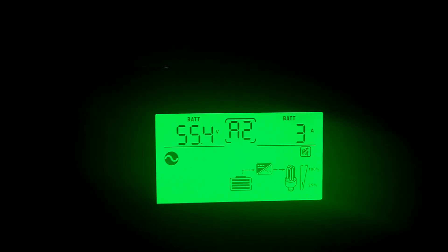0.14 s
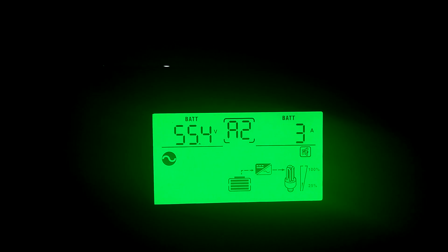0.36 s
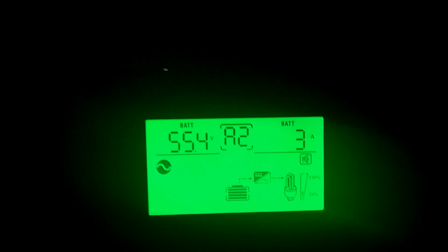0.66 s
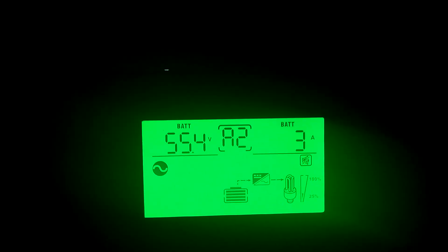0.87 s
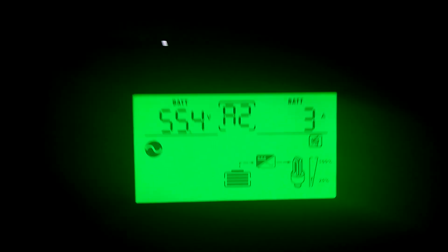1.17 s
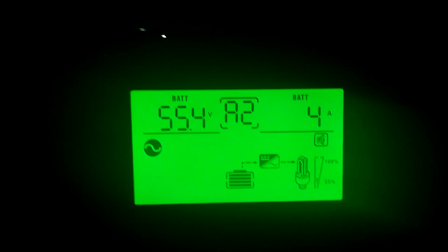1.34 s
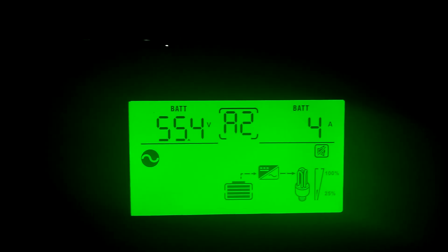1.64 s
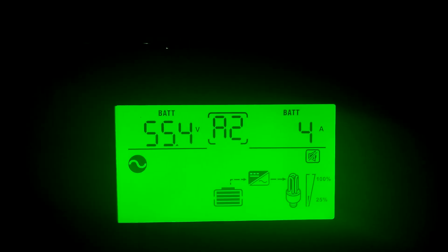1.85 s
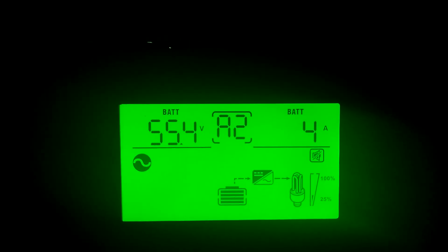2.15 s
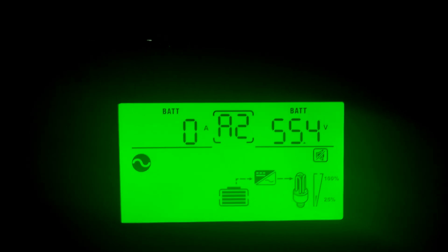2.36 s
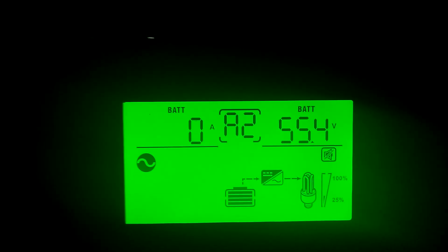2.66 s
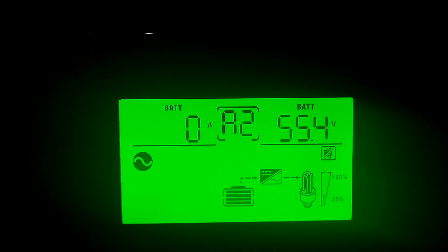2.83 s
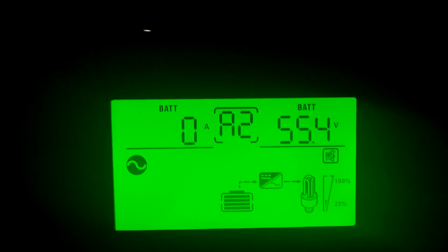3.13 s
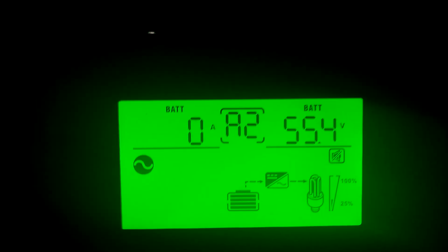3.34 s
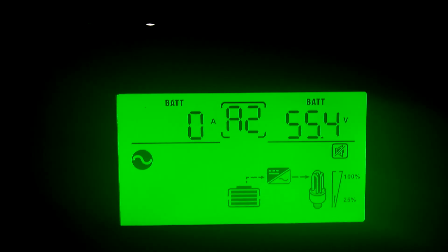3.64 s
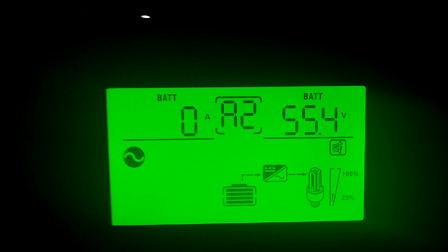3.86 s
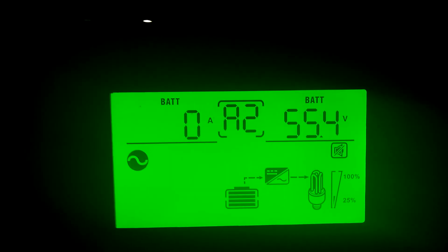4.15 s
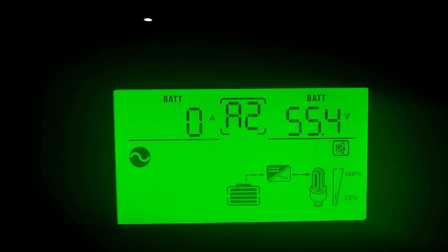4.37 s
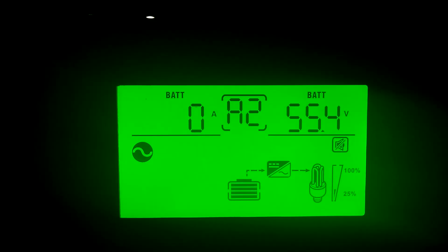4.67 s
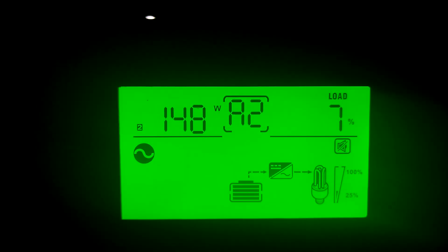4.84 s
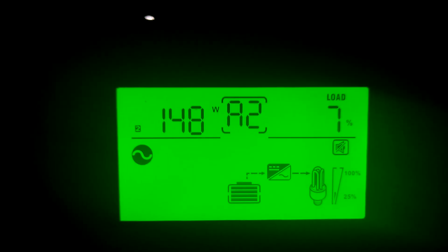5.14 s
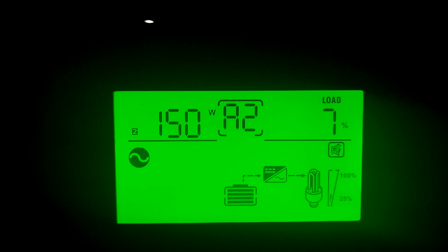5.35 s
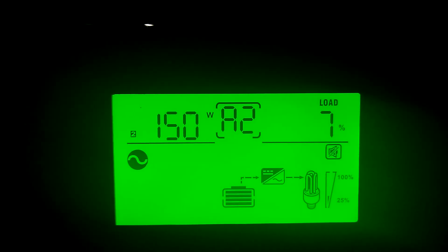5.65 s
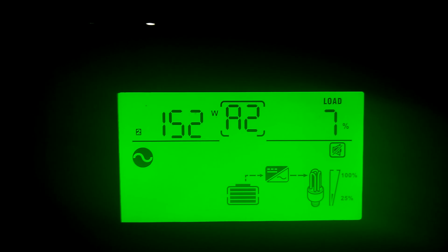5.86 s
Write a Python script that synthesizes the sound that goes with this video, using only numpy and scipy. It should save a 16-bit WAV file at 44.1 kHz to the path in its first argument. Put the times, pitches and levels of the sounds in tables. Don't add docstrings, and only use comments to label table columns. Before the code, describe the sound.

Two crisp plastic button clicks, each with a softer, duller release, stand out close by over a faint low fan hum in a quiet room.

```python
import sys
import numpy as np
from scipy import signal
from scipy.fft import rfft, irfft
from scipy.io import wavfile

SR = 44100
rng = np.random.default_rng(int(sys.argv[2]) if len(sys.argv) > 2 else 0)


def transcribe(signal):
    frames = np.atleast_2d(signal).T
    limited = np.clip(frames, -1, 1)
    pcm = np.round(limited * 32767).astype(np.int16)
    wavfile.write(sys.argv[1], SR, pcm)


def voltage_ratio(decibels):
    exponent = np.asarray(decibels, float) / 20
    return 10 ** exponent


N = 264644

# [t/s, peak level/dB, treble/dB]
PRESSES = [
    (1.949, -16, -1),
    (4.2667, -16.5, 5),
]
# [t/s, peak level/dB]
RELEASES = [
    (2.1390, -26),
    (4.4415, -25.5),
]
# [t/s, peak level/dB, knock against tick/dB, treble/dB, body under the rasp/dB]
TICKS = [
    (0.9717, -46.5, -0.5, 9.5, 14.5),
    (3.6146, -66, -6, -11, -6),
    (3.6391, -40.5, -9.5, -4.5, -20),
    (4.0242, -45.5, -1, -4, -9.5),
    (5.8836, -41, -5, -10, -12),
]
# [t/s, peak level/dB, f/Hz, length/s]
CREAKS = [(1.23, -63.5, 1970, 0.028), (1.303, -64.5, 1980, 0.02), (1.374, -57.5, 2040, 0.012),
          (3.687, -57, 1450, .006), (4.044, -59.5, 1100, .008), (0.437, -63, 460, .03),
          (3.677, -44.5, 230, 0.063), (3.691, -46, 527, .03), (4.073, -45.5, 254, 0.033),
          (1.756, -44.5, 221, 0.045), (5.743, -55, 295, 0.037)]
# [f/Hz, level/dB, t60/s]
PRESS_MODES = [(283, -19.5, 0.1), (645, -11, .1), (960, -4.5, 0.037), (1890, -10, .05), (2076, -7, 0.19),
               (2410, -10.5, .05), (2825, -3, 0.097), (4250, 4.5, 0.086), (5670, -6.5, 0.026),
               (6830, -8, .03), (8440, 4.5, .04), (10580, -8.5, .05), (11640, -6.5, 0.044)]
RELEASE_MODES = [(230, -1, 0.022), (308, -12, 0.056), (554, -10.5, 0.3), (683, -23.5, 0.074),
                 (793, 0, 0.27), (983, 1.5, 0.17), (1450, -6, 0.043), (2107, -14, 0.05)]
# [f/Hz, level per Hz/dB]
PRESS_COLOUR = [(120, -18.5), (260, -7), (440, -19), (570, -13.5), (900, -6.5), (1400, -11.5), (2250, -0.5),
                (2850, -5), (3600, -4.5), (5500, -4), (7200, -3.5), (9000, -5), (12000, -3.5), (16000, -20)]
RELEASE_COLOUR = [(120, -11), (240, -2), (440, -13.5), (570, -6), (750, -4), (1150, -10), (1500, -7),
                  (2250, -5.5), (2900, -8.5), (3700, -14), (5700, -18.5), (9000, -16.5), (12000, -14.5),
                  (16000, -32.5)]
RASP_COLOUR = [(150, -35.5), (3000, -13), (4500, -17), (5700, -6), (9000, -7), (11500, 0), (14000, -6),
               (16000, -9)]
KNOCK_COLOUR = [(100, -9), (250, 1.5), (450, -8.5), (720, -5), (1200, -26), (2200, -20.5), (3500, -43),
                (16000, -42.5)]
# [f/Hz, t60/s]
PANEL_T60 = [(250, 0.18), (900, 0.18), (2200, 0.081), (5000, 0.025), (11500, 0.039), (15000, 0.096)]
ROOM_T60 = [(250, 0.12), (900, 0.75), (2200, 0.49), (5000, 0.32), (12000, 0.2), (15000, .15)]
# [f/Hz, level/dB]
ROOM_DB = [(250, -14), (900, -17.5), (2200, -21), (5000, -18), (8000, -20), (12000, -15), (15000, -31.5)]
# [f/Hz, left minus right/dB]
BUTTON_SHADOW = [(300, -1.5), (560, 0.5), (900, 8), (1300, 10.5), (2300, 8.5), (3600, 6.5), (5300, 2),
                 (7200, 9.5), (9000, 13.5), (11500, 19.5)]
TOUCH_SHADOW = [(250, 9), (1000, 12), (5000, 18), (10000, 24)]
# [f/Hz, share]
NEAR_ALIKE = [(150, .97), (700, .95), (2000, .8), (8000, .5)]
# [f/Hz, level per Hz/dB]
RUB_COLOUR = [(3000, -17), (6000, -8.5), (9000, -3), (12000, 1), (15000, -2.5), (16500, -12)]
# [t/s, rub level/dB, fade/dB per s]
SLIDES = [(0.0, -73.5, 90), (.9, -76, 29.5), (1.02, -68.5, 29), (1.99, -71, 21.5), (2.161, -68, 47.5),
          (2.66, -80, 9.5), (2.97, -78, 36), (3.66, -69, 54.5), (4.04, -72, 25.5), (4.45, -64.5, 43),
          (5.0, -76.5, 16), (5.16, -78.5, 24), (5.91, -69.5, 19)]
# [f/Hz, level per Hz/dB]
HUM_COLOUR = [(15, -47), (25, -18), (59, -5), (180, -7.5), (215, -4.5), (286, -6), (320, -15.5), (366, -12),
              (510, -15), (680, -28), (743, -18.5), (927, -24.5), (5000, -46.5), (6500, -73), (11000, -120)]
# [f/Hz, width/Hz, level/dB]
HUM_PEAKS = [(59.4, 1.1, -9), (210.7, 4.2, -5), (245, 19, -12.5), (278, 8, -5), (628, 15, -16),
             (753.5, 38, -11.5), (2315, 270, -24), (2450, 40, -27)]
# [f/Hz, left minus right/dB]
HUM_ALIKE = [(60, -0.37), (130, -0.67), (290, -0.84), (640, -0.37), (1410, 0.028), (3100, -0.74), (6820, 1),
             (15000, -0.057)]
HUM_BALANCE = [(60, 3), (110, 0), (200, 3.5), (380, 2.5), (700, 7.5), (1290, 3), (2380, 7.5), (4400, -5.5),
               (8120, 3.5), (15000, 3.5)]
# [t/s, hum level/dB]
NEARNESS = [(0, -66.5), (1.3, -65), (1.7, -64), (3.6, -62.5), (6.0, -63.5)]
# [t/s, swell/dB]
LEANS = [
    (0.0, 3.5),
    (1.08, 3.5),
    (2.14, 8.5),
    (3.66, 3.5),
    (4.04, 0.5),
    (4.45, 9.5),
    (5.95, 3),
]
# [f/Hz, level per Hz/dB]
HISS_COLOUR = [(1000, -3), (2500, -2), (4000, -9), (7000, -8.5), (10000, -7), (13000, -8), (16000, -5)]

EDGES_HZ = 25 * 2 ** np.arange(0, 9.5, 1 / 3)
LEFT_RIGHT = np.array([[1], [-1]])


def buttons():
    press = blow(PRESS_COLOUR, PRESS_MODES, BUTTON_SHADOW, modes_db=-8, chatter_s=0.00082,
                 thump_db=-30.5, rise_s=.00005, push_db=0, push_s=.0003)
    release = blow(RELEASE_COLOUR, RELEASE_MODES, BUTTON_SHADOW, modes_db=-8, chatter_s=0.0044,
                   thump_db=-18, rise_s=0.00033, push_db=7, push_s=.0011)
    times, levels_db = np.transpose(RELEASES)
    out = play(release, times, levels_db + 6)
    for s, db, treble_db in PRESSES:
        out = out + play(brighter(press, 5000, treble_db), [s], [db + 7])
    under, above = split(out, 14800, order=6)
    return under + voltage_ratio(-11) * above


def blow(colour, modes, shadow, modes_db, chatter_s, thump_db, rise_s, push_db, push_s):
    t = np.arange(int(.5 * SR)) / SR
    force = (1 - np.exp(-t / rise_s)) * np.exp(-t / chatter_s) * rng.standard_normal(len(t))
    clear = 0 * force
    for hz, db, t60 in modes:
        clear = clear + voltage_ratio(db) * rms_one(ring(force, hz, np.clip(t60, .005, .2)))
    clear = voltage_ratio(modes_db) * clear / (np.abs(clear).max() + 1e-9)

    flex = np.sin(2 * np.pi * t / push_s) * np.sin(np.pi * t / (1.5 * push_s)) * (t < 1.5 * push_s)
    direct = rfft(clear - voltage_ratio(push_db) * flex / 2)

    dense = rfft(dying_noise(colour, t, rise_s, chatter_s))
    common, own_left, own_right, room_left, room_right = dense
    hz = np.maximum(np.fft.rfftfreq(len(t), 1 / SR), 1)
    c = at_hz(NEAR_ALIKE, hz)
    room_right = c ** 2 * room_left + np.sqrt(1 - c ** 4) * room_right
    near = direct + np.sqrt(c) * common
    late = np.exp(-2j * np.pi * hz * .00025)
    left = late * (near + np.sqrt(1 - c) * own_left) + room_left
    right = -voltage_ratio(-at_hz(shadow, hz)) * (near + np.sqrt(1 - c) * own_right + room_right)
    fade = np.clip((t[-1] - .05 - t) / .1, 0, 1)

    shove = np.exp(-((t - 0.016) / 0.0016) ** 2) / (0.0042 * SR)
    thump = voltage_ratio(thump_db) * ring(shove, 114, t60=0.28)
    return fade * irfft(np.array([left, right]), len(t)) + thump * [[1], [.9]]


def dying_noise(colour, t, rise_s, chatter_s):
    white, out = rng.standard_normal((2, 5, len(t))), 0
    for k, hz in enumerate(EDGES_HZ[5:-1] * 2 ** (1 / 6)):
        panel = (1 - np.exp(-t / rise_s)) * voltage_ratio(-60 * np.maximum(t - chatter_s, 0) / at_hz(PANEL_T60, hz))
        panel = panel * (1 + voltage_ratio(8 - 60 * t / 0.0047))
        room = voltage_ratio(at_hz(ROOM_DB, hz) - 60 * t / at_hz(ROOM_T60, hz)) * np.minimum(t / 0.0087, 1)
        shape = np.array([panel] * 3 + [room] * 2)
        rung = third_octave(white[k % 2] * shape, hz)
        evened = np.sqrt(hz * np.sum(shape ** 2, axis=1) / np.sum(rung ** 2, axis=1))
        out = out + voltage_ratio(at_hz(colour, hz)) * rung * evened[:, None]
    return out / np.abs(out[0]).max()


def ring(force, hz, t60):
    r, w = voltage_ratio(-60 / (t60 * SR)), 2 * np.pi * hz / SR
    return signal.lfilter([0, np.sin(w)], [1, -2 * r * np.cos(w), r * r], force + 1e-18)


def play(sound, times, levels_db):
    marks = np.zeros(N)
    marks[np.round(np.array(times) * SR).astype(int)] = voltage_ratio(levels_db)
    return signal.fftconvolve(sound, marks[None], axes=1)[:, :N]


def brighter(sound, corner_hz, treble_db):
    dull = signal.sosfilt(signal.butter(1, corner_hz, fs=SR, output="sos"), sound)
    return dull + voltage_ratio(treble_db) * (sound - dull)


def split(sound, hz, order):
    low = signal.butter(order, hz, fs=SR, output="sos")
    high = signal.butter(order, hz, "high", fs=SR, output="sos")
    return signal.sosfilt(low, sound), signal.sosfilt(high, sound)


def third_octave(sound, hz):
    limits = [hz * 2 ** (-1 / 6), hz * 2 ** (1 / 6)]
    return signal.sosfilt(signal.butter(2, limits, "band", fs=SR, output="sos"), sound)


def at_hz(points, hz):
    table_hz, values = np.transpose(points)
    return np.interp(np.log(hz), np.log(table_hz), values)


def rms_one(x):
    return x / np.sqrt(np.mean(x ** 2) + 1e-20)


def fingertip():
    out = 0
    for s, db, knock_db, treble_db, body_db in TICKS:
        rasp = blow(RASP_COLOUR, [], TOUCH_SHADOW, modes_db=-60, chatter_s=0.00048,
                    thump_db=-58, rise_s=0.0008, push_db=-60, push_s=.0011)
        knock = blow(KNOCK_COLOUR, [], TOUCH_SHADOW, modes_db=-60, chatter_s=0.036,
                     thump_db=-32.5, rise_s=0.0033, push_db=-60, push_s=.0011)
        body, top = split(rasp, 10500, order=4)
        rasp = brighter(body + voltage_ratio(treble_db) * top, 3500, -body_db)
        out = out + play(rasp, [s - .001], [db + body_db + 5])
        out = out + play(knock, [s], [db + knock_db])
    return out


def creaks():
    out, t = np.zeros((2, N)), np.arange(N) / SR
    for s, db, hz, length_s in CREAKS:
        slip = np.exp(-((t - s) / length_s) ** 2) * rng.standard_normal(N)
        tone = ring(slip, hz, t60=30 / hz)
        far = -.35 if hz < 900 else .3
        out += voltage_ratio(db) * tone / np.abs(tone).max() * [[1], [far]]
    return out


def skin_rub():
    s, db, fade = np.transpose(SLIDES)[:, :, None]
    since = np.arange(0, N + 64, 64) / SR - s
    slide_db = db + np.minimum(150 * since, -fade * since)
    power = voltage_ratio(2 * slide_db).sum(axis=0)
    level = np.interp(np.arange(N) / 64, np.arange(len(power)), np.sqrt(power))
    return level * steady(RUB_COLOUR, [(1000, .1), (9000, 0.084)], [(4000, 4), (12000, 4.5)], patchy_db=-2.5)


def steady(colour, alike, balance, patchy_db):
    out, together = 0, drift(2.7)
    white = rng.standard_normal((2, 2, N))
    for k, hz in enumerate(EDGES_HZ[:-1] * 2 ** (1 / 6)):
        if not colour[0][0] / 1.2 <= hz <= colour[-1][0] * 1.2:
            continue
        mid, side = third_octave(white[k % 2], hz)
        c = np.clip(at_hz(alike, hz), -1, 1)
        pair = np.sqrt(1 + c) * mid + np.sqrt(1 - c) * side * LEFT_RIGHT
        gain = voltage_ratio(at_hz(colour, hz) + patchy_db * (0.26 * together + drift(13)))
        out = out + gain * lean(balance, hz) * pair
    return rms_one(out)


def drift(rate):
    r = np.exp(-80 * np.pi * rate / SR)
    white = rng.standard_normal(N // 40 + 2002)
    slow = signal.lfilter([1], [1, -2 * r, r * r], white)[2000:]
    return np.interp(np.arange(N) / 40, np.arange(len(slow)), rms_one(slow))


def lean(balance, hz):
    return voltage_ratio(at_hz(balance, hz) / 2 * LEFT_RIGHT)


def room_hum(hum_db):
    out = steady(HUM_COLOUR, HUM_ALIKE, HUM_BALANCE, patchy_db=1.35)
    for hz, width_hz, db in HUM_PEAKS:
        common, left, right = ring(rng.standard_normal((3, N)), hz, t60=2.2 / width_hz)
        c = np.clip(-at_hz(HUM_ALIKE, hz), 0, 1)
        pair = np.sqrt(c) * common * LEFT_RIGHT + np.sqrt(1 - c) * np.array([left, right])
        out = out + voltage_ratio(db + 0.94 * drift(9.8)) * rms_one(pair * lean(HUM_BALANCE, hz))
    return voltage_ratio(hum_db + 3.5) * out


def hum_level():
    t = np.arange(N) / SR
    level_db = np.interp(t, *np.transpose(NEARNESS))
    rise_s, fall_s = 0.13, .17
    for s, db in LEANS:
        level_db = level_db + db * np.exp(np.minimum((t - s) / rise_s, (s - t) / fall_s))
    return level_db


def scene():
    return buttons() + fingertip() + creaks() + skin_rub() + room_hum(hum_level())


def band_limit(x):
    return signal.sosfilt(signal.butter(12, 16560, fs=SR, output="sos"), x)


def record(dry):
    hiss = steady(HISS_COLOUR, [(1000, 0.0059), (9000, 0.0075)], [(2500, 3), (9000, .4)], patchy_db=-1.54)
    top_cut = signal.cheby2(16, 35, 15900, fs=SR, output="sos")
    mix = signal.sosfilt(top_cut, dry + voltage_ratio(-77) * hiss)
    return band_limit(mix)


dry = scene()
out = record(dry)
transcribe(out)
```